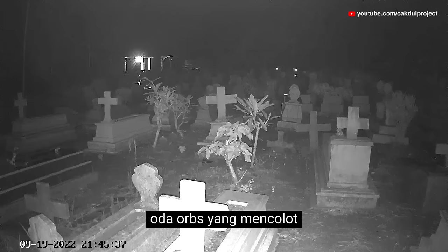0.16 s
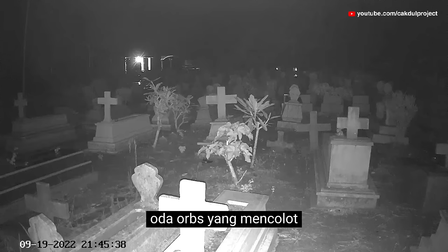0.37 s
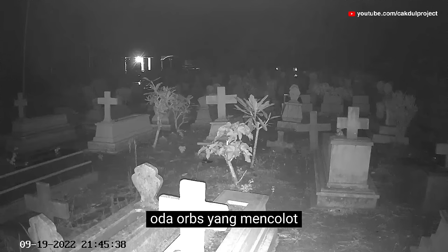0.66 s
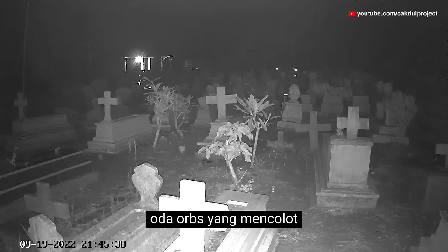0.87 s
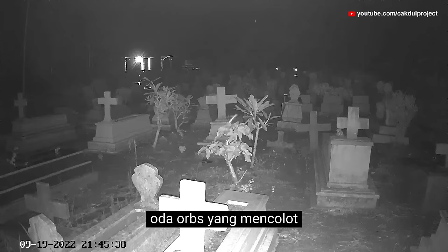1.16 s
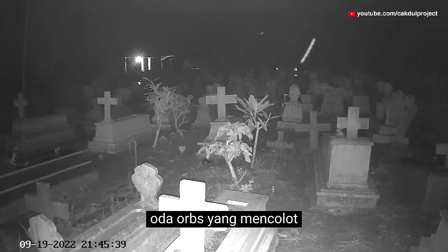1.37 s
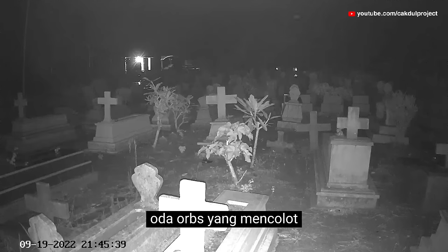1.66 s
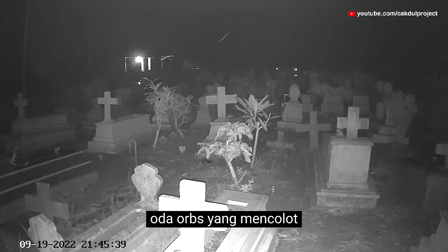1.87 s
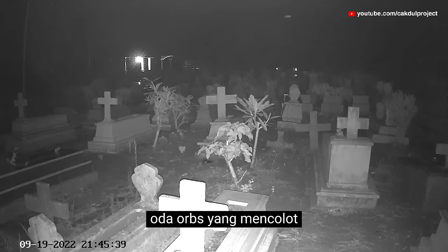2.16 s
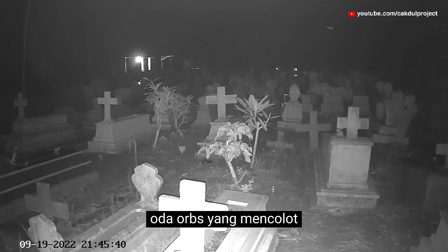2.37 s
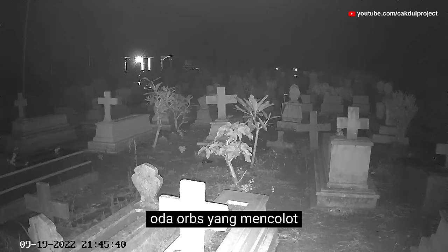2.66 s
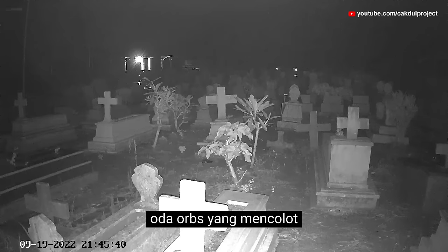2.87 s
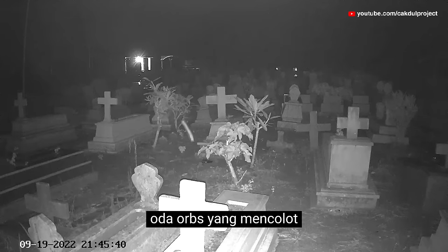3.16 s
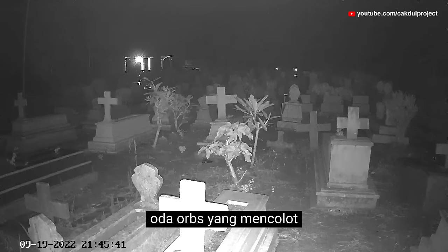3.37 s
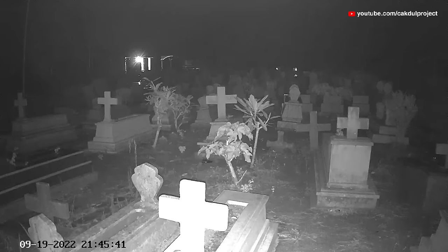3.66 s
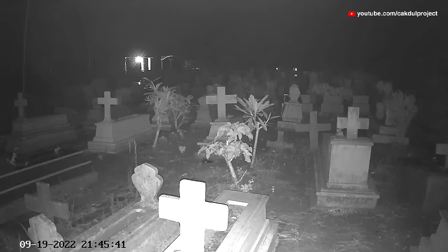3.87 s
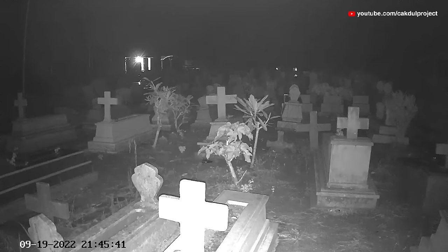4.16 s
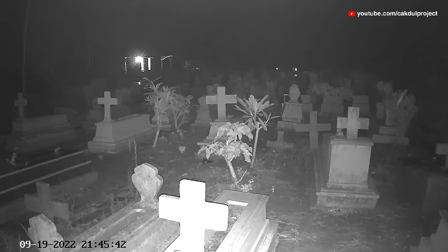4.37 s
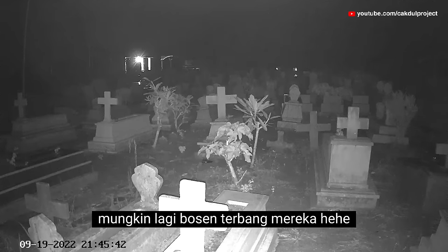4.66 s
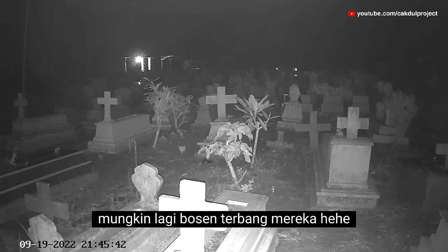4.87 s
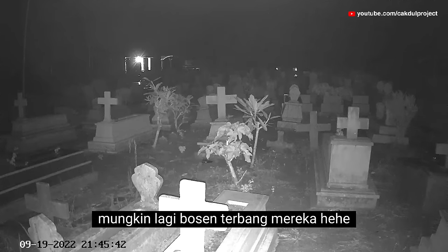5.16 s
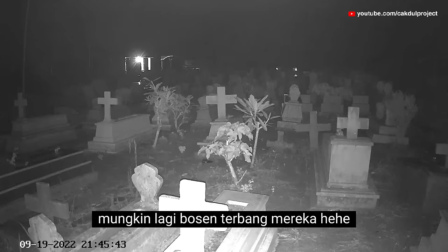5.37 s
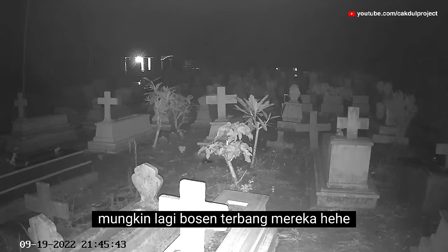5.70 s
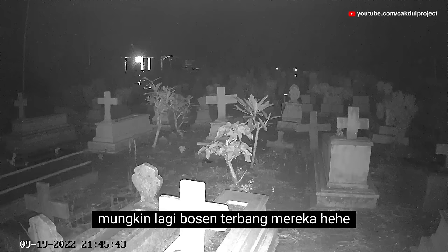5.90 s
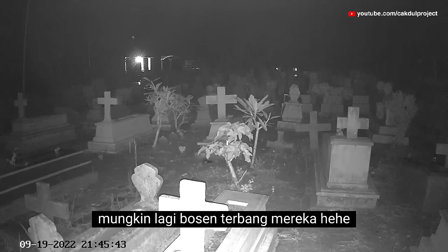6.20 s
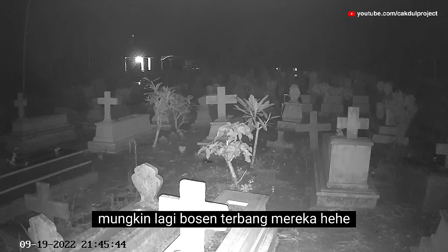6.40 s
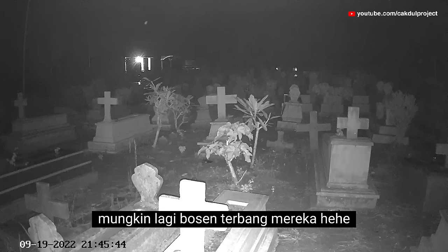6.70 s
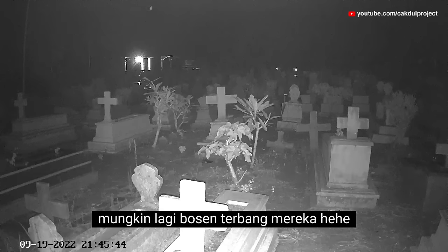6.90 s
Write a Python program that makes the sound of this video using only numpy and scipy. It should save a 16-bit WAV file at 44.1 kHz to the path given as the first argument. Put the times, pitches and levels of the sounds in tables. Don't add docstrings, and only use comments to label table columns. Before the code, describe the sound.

Outdoors at night, a nearby frog trills in soft, round, hollow notes about ten a second, strongest around three to four seconds, then pausing and returning near six. Neighbours add lower falling gulps, a small frog pipes faintly higher, and a far chorus murmurs behind. Deep wind and distant traffic rumble, with dull thumps on the small, slightly hissy microphone.

```python
import sys
import numpy as np
from scipy import signal
from scipy.fft import rfft, irfft
from scipy.io import wavfile
from scipy.ndimage import uniform_filter1d

SR = 44100
rng = np.random.default_rng(int(sys.argv[2]) if len(sys.argv) > 2 else 0)


def voltage_ratio(level):
    return 10 ** (np.asarray(level, float) / 20)


def inscribe(sig):
    pcm = np.round(np.clip(np.atleast_2d(sig).T, -1, 1) * 32767)
    wavfile.write(sys.argv[1], SR, pcm.astype(np.int16))


N = 310464


def rms_one(x):
    return x / np.sqrt(np.mean(x ** 2) + 1e-20)


def in_time(rows):
    s, value = np.transpose(rows)
    return np.interp(np.arange(N) / SR, s, value)


def coloured(points):
    hz = np.maximum(np.arange(N // 2 + 1) * SR / N, 0.5)
    point_hz, point_db = np.transpose(points)
    shape = voltage_ratio(np.interp(np.log(hz), np.log(point_hz), point_db))
    return rms_one(irfft(rfft(rng.standard_normal(N)) * shape, N))


def resonate(x, hz, width):
    r = np.exp(-np.pi * width / SR)
    stage = [1, 0, -1, 1, -2 * r * np.cos(2 * np.pi * hz / SR), r * r]
    return rms_one(signal.sosfilt([stage, stage], x)[-N:])


def bell(s, length_ms, squareness):
    reach = int(3 * length_ms / 1000 * SR)
    centre = round(s * SR)
    at = np.arange(max(centre - reach, 0), min(centre + reach, N))
    t = at / SR - s
    shape = np.exp(-np.log(2) / 2 * np.abs(t * 2000 / length_ms) ** squareness)
    return at, t, shape


def puffs(rows, stretch, sag, octave_db, held):
    out = np.zeros(N)
    for s, peak_db, hz, length_ms in rows:
        squareness = 2 + held * max(length_ms - 12, 0)
        at, t, shape = bell(s, stretch * length_ms, squareness)
        phase = 2 * np.pi * (rng.random() + hz * t * (1 - sag * t / 2))
        octave = voltage_ratio(octave_db) * shape * np.sin(2 * phase)
        out[at] += voltage_ratio(peak_db) * shape * (np.sin(phase) + octave)
    return out


def trill():
    # t/s, peak level/dB, f/Hz, length/ms
    full = [(2.625, -26, 754, 13), (2.721, -27, 735, 9.4), (2.832, -39.5, 747, 26),
            (2.916, -18.5, 731, 7.4), (3.008, -30, 740, 9), (3.033, -25, 754, 5.4),
            (3.113, -17.8, 726, 10.7), (3.205, -22, 745, 7.8), (3.219, -20.5, 754, 7.5),
            (3.305, -19, 710, 11.7), (3.395, -16.5, 733, 12), (3.488, -23.5, 696, 9),
            (3.59, -19.5, 738, 23), (3.68, -25.5, 690, 5.7), (3.779, -24, 727, 10.6),
            (3.871, -36.5, 715, 7.2), (5.97, -32.5, 726, 19), (6.08, -26, 760, 5.5),
            (6.194, -31.5, 717, 5.3), (6.291, -24.5, 746, 25), (6.315, -21, 740, 5.3),
            (6.371, -23.5, 705, 12), (6.477, -32, 770, 8.7), (6.501, -33, 735, 5.6), (6.57, -29, 677, 22),
            (6.654, -33.5, 746, 16), (6.703, -33.5, 685, 21), (6.825, -32.5, 700, 10),
            (6.879, -31, 672, 9.3), (6.942, -38.5, 690, 14)]
    # t/s, peak level/dB, f/Hz
    soft = [(0.016, -27.5, 681), (0.102, -32.5, 715), (0.208, -35.5, 670), (0.307, -31, 746),
            (0.403, -31, 677), (0.503, -30, 731), (0.6, -29.5, 694), (0.689, -37, 718), (0.79, -38, 690),
            (0.87, -36, 725), (0.986, -40.5, 690), (1.11, -34, 677), (1.165, -33, 700), (1.229, -36, 690),
            (1.358, -39.5, 690), (1.475, -41, 700), (1.655, -39, 690), (1.742, -35, 683),
            (1.834, -32.5, 730), (1.943, -35.5, 726), (2.03, -41, 720), (2.128, -36, 730),
            (2.328, -34, 730), (2.414, -34, 749), (2.52, -38, 735), (5.326, -37, 712), (5.714, -33, 690),
            (5.825, -43, 740), (5.888, -41, 750), (6.171, -37, 764)]
    # delay/s, level/dB, share of the pitch, length/ms
    emptying = [
        (.021, -12.5, 0.88, 5.1),
        (.029, -13, 0.762, 7.3),
        (.038, -15, 0.65, 6.5),
    ]
    soft_ms = 14.9
    quiet = [(*row, soft_ms) for row in soft]
    quiet += [(4.158 + k * 0.1225, -41.5, 700, soft_ms) for k in range(6)]
    after = []
    for s, db, hz, _ in full:
        for lag, loss_db, share, ms in emptying:
            after.append((s + lag, db + loss_db, hz * share, ms))
    beat = puffs(full + quiet, stretch=1.086, sag=1.07, octave_db=-35, held=0.09)
    return beat + puffs(after, stretch=1.02, sag=8.0, octave_db=-21, held=0)


def gulps():
    # t/s, peak level/dB, f/Hz
    gulp_rows = [(0.725, -27, 540), (0.851, -32, 577), (1.228, -27, 570), (1.299, -29.5, 535),
                 (1.362, -31, 553), (2.36, -31, 410), (2.565, -29.5, 436), (3.105, -25, 604),
                 (3.146, -26.5, 463), (3.615, -28.5, 500), (2.955, -30, 486), (3.287, -28, 590),
                 (5.335, -31.5, 547), (5.841, -32.5, 427), (5.961, -32, 545), (6.2, -29, 555),
                 (6.466, -33, 495), (6.592, -24, 443), (6.709, -28, 530), (6.971, -32, 534)]
    return puffs([(*row, 9) for row in gulp_rows], stretch=0.75, sag=8.2, octave_db=-24, held=0)


def piping():
    # t/s, peak level/dB, f/Hz
    pipe_rows = [(0.119, -45, 1240), (0.437, -46, 1270), (1.102, -42.5, 1199), (1.397, -50, 1240),
                 (2.743, -46, 1200), (3.121, -41.5, 1350), (3.314, -46, 1320), (3.699, -42, 1240),
                 (4.064, -45.5, 1265), (4.19, -45, 1270), (4.225, -46.5, 1270), (5.899, -44, 1150),
                 (5.954, -45, 1239), (6.07, -44.5, 1310), (6.196, -48, 1230), (6.319, -45, 1210)]
    return puffs([(*row, 12.3) for row in pipe_rows], stretch=0.75, sag=0.3, octave_db=-53.5, held=0)


def near_frogs():
    # delay/s, level/dB
    echoes = [
        (.021, -16.5),
        (.047, -37),
        (.083, -16.5),
    ]
    direct = trill() + gulps() + piping()
    return direct + sum(voltage_ratio(db) * np.roll(direct, round(s * SR)) for s, db in echoes)


def insect_ticks():
    # t/s, peak level/dB, f/Hz
    tick_rows = [
        (1.706, -61, 3006),
        (1.729, -56, 2985),
        (1.755, -64, 2940),
        (1.822, -66, 2969),
        (2.232, -55, 2981),
        (6.435, -64, 2964),
        (6.481, -57, 2977),
    ]
    return puffs([(*row, 6) for row in tick_rows], stretch=0.87, sag=0.3, octave_db=-14.5, held=0)


def rasps():
    # t/s, level/dB (rms), centre f/Hz, width/Hz, length/ms, scrapes per s
    rasp_rows = [
        (1.025, -70, 2180, 150, 20, 62),
        (1.045, -71, 2170, 200, 25, 70),
        (1.075, -60.5, 2200, 200, 30, 61),
        (1.125, -75, 2300, 130, 45, 64),
        (.585, -74, 2540, 120, 23, 100),
        (3.22, -58.5, 1650, 138, 31, 47),
        (5.095, -65, 1700, 500, 47, 130),
    ]
    # t/s, peak level/dB, f/Hz, length/ms
    chirps = [
        (1.05, -66, 2170, 35),
        (1.082, -58, 2260, 22),
    ]
    out = puffs(chirps, stretch=0.9, sag=-0.94, octave_db=-40, held=0)
    for s, rms_db, hz, width, length_ms, per_s in rasp_rows:
        at, _, shape = bell(s, length_ms, 1.1)
        knocks = np.diff(np.floor(np.arange(N + 1) * per_s / SR))
        scrapes = knocks + 0.1 * rng.standard_normal(N)
        out[at] += voltage_ratio(rms_db) * shape * resonate(scrapes, hz, width)[at]
    return out


def voices_together(voices, per_s, spread_db):
    out = 0
    for hz, width, level_db in voices:
        uneven_db = spread_db * np.minimum(rng.exponential(1, N + SR), 4)
        size = voltage_ratio(uneven_db) * rng.choice([-1, 1], N + SR)
        calls = size * (rng.random(N + SR) < per_s / SR) + 1e-18
        out = out + voltage_ratio(level_db) * resonate(calls, hz, width)
    return rms_one(out)


def far_chorus():
    # f/Hz, width/Hz, level/dB
    low_voices = [(394, 58, -2.5), (443, 47, -3.5), (500, 55, -5), (555, 91, 1.5)]
    middle_voices = [(690, 58, 1), (735, 79, -3.5)]
    high_voices = [(1019, 60, -7.5), (1106, 60, -5.5), (1148, 28, -4.5), (1209.4, 34, -2),
                   (1257.4, 51, -0.5), (1327, 97, -4), (1463, 94, -12.5), (1565, 42, -16.5)]
    # t/s, level/dB
    eager = [(0, 3.5), (0.5, 1.5), (1.3, -0.5), (1.7, -2), (2.3, -3), (2.8, 3), (3.2, 4.5), (3.7, 2.5),
             (4.1, -3), (4.9, -1.5), (5.5, 0.5), (6.0, 2), (6.5, 2.5), (7.04, 1)]
    eager_db = in_time(eager)
    far = voltage_ratio(-43 + 0.49 * eager_db) * voices_together(low_voices, per_s=250, spread_db=1.0)
    far = far + voltage_ratio(-48 + 1.27 * eager_db) * voices_together(middle_voices, per_s=400, spread_db=1.0)
    far = far + voltage_ratio(-55 + 0.79 * eager_db) * voices_together(high_voices, per_s=500, spread_db=0.0)
    canopy_hz = 1663
    return signal.sosfilt(signal.butter(8, canopy_hz, fs=SR, output="sos"), far)


def night_air():
    # f/Hz, level/dB (per Hz)
    air = [(60, -3.5), (130, -0.5), (220, -3.5), (320, 3.5), (362, -8), (600, -11), (780, -16),
           (860, -12.5), (1050, -16), (1450, -16), (1590, -29), (1625, -40), (1900, -56)]
    return voltage_ratio(-44.5) * coloured(air)


def holes_in_far_sound(x):
    # f/Hz, level/dB
    hole_threshold = [(300, -20), (800, -8), (1000, -2), (1600, 1)]
    hz, _, cells = signal.stft(x, SR, nperseg=6144)
    power = np.abs(cells) ** 2 + 1e-20
    share = voltage_ratio(np.interp(hz, *np.transpose(hole_threshold)))[:, None] ** 2
    threshold = share * uniform_filter1d(power, size=15, axis=1)
    return signal.istft(cells * power / (power + threshold), SR, nperseg=6144)[1][:N]


def crickets():
    # f/Hz, width/Hz, level/dB (rms), swell/dB
    cricket_bands = [(2720, 800, -76, 3), (5780, 980, -78, -0.5), (7430, 900, -87.5, 2)]
    out = np.zeros(N)
    for hz, width, rms_db, swell_db in cricket_bands:
        swell = np.interp(np.arange(N), np.linspace(0, N, 40), rng.standard_normal(40))
        out += voltage_ratio(rms_db + swell_db * swell) * resonate(rng.standard_normal(N), hz, width)
    return out


def wind_buffets():
    # t/s, thump level/dB, thump length/ms, knock level/dB
    buffets = [(0.11, -24, 79, -46), (0.293, -22, 22, -43), (0.393, -15, 12, -24), (1.332, -30, 23, -25.5),
               (1.66, -18, 22, -19.5), (1.715, -23, 22, -40), (1.926, -23, 37, -35), (2.24, -17.5, 60, -29),
               (2.271, -33, 15, -21.5), (2.556, -17.5, 21, -47), (2.662, -27, 27, -17),
               (2.913, -25, 22, -21.5), (3.114, -35, 22, -21.5), (3.513, -17.5, 32, -37),
               (3.904, -30, 20, -19), (4.183, -20, 64, -42), (4.285, -21, 43, -32), (4.326, -32, 29, -21),
               (4.385, -18.5, 57, -23), (4.455, -18, 15, -21), (4.613, -18, 30, -20.5),
               (4.668, -17, 28, -19), (4.83, -22, 27, -17.5), (4.998, -19, 32, -33),
               (5.234, -17.5, 24, -30), (5.406, -18.5, 35, -39), (5.991, -35, 20, -22.5),
               (6.125, -43, 20, -22.5), (6.4, -29, 20, -26), (6.875, -28, 23, -24)]
    thump_hz, knock_hz, knock_ms = 38, 91, 11
    lumps = [(s, db, thump_hz, ms) for s, db, ms, _ in buffets]
    lumps += [(s, db, knock_hz, knock_ms) for s, _, _, db in buffets]
    return puffs(lumps, stretch=0.83, sag=0.3, octave_db=-28.0, held=0)


def rumble():
    # f/Hz, level/dB (per Hz)
    rumble_curve = [(1.2, -2), (2.5, -3), (8, 7.5), (20, -4.5), (30, -6), (60, -8), (140, -18.5),
                    (190, -24.5), (260, -32.5), (400, -81)]
    # t/s, level/dB
    wind = [(0, -21.5), (0.2, -27.5), (0.84, -30), (1.17, -26), (1.6, -30), (1.84, -24), (2.15, -32.5),
            (2.45, -25.5), (3.02, -27), (3.6, -30), (3.75, -24), (3.95, -30), (4.3, -25), (4.65, -33.5),
            (4.9, -25), (5.6, -28.5), (6.3, -29), (7.04, -28.5)]
    return voltage_ratio(in_time(wind) + 2.5) * coloured(rumble_curve)


def engines():
    # f/Hz, width/Hz, level/dB (rms)
    throbs = [(15.86, 1.54, -31.5), (46, 1.24, -44)]
    return sum(voltage_ratio(db) * resonate(rng.standard_normal(N + SR), hz, width) for hz, width, db in throbs)


def microphone_hiss():
    # f/Hz, level/dB (per Hz)
    hiss_curve = [(1000, -17), (1650, -3), (2100, -4), (2500, -4), (3050, -3), (3300, -4), (4500, -4.5),
                  (5300, -5.5), (5850, -3), (6400, -4), (7300, -5), (8500, -10), (12000, -10), (16500, -10)]
    return voltage_ratio(-63.5) * coloured(hiss_curve)


def scene():
    far = holes_in_far_sound(voltage_ratio(2.0) * (far_chorus() + night_air()))
    insects = insect_ticks() + rasps() + crickets()
    wind_and_traffic = rumble() + wind_buffets() + engines()
    return (near_frogs() + far + insects + wind_and_traffic)[None]


def top_cut(x):
    return signal.sosfilt(signal.butter(12, 15510, fs=SR, output="sos"), x)


def record(dry):
    offset = -0.0033
    return top_cut(dry + microphone_hiss() + offset)


dry = scene()
out = record(dry)
inscribe(out)
```